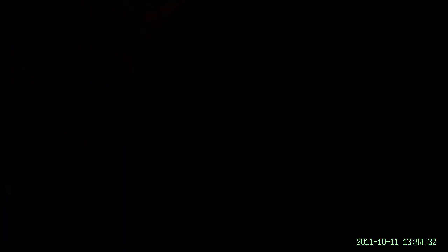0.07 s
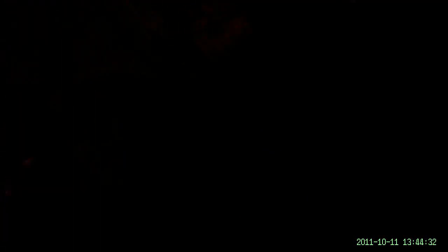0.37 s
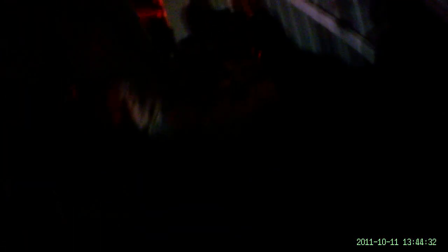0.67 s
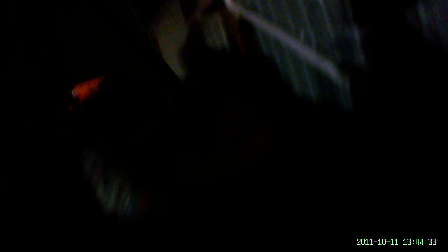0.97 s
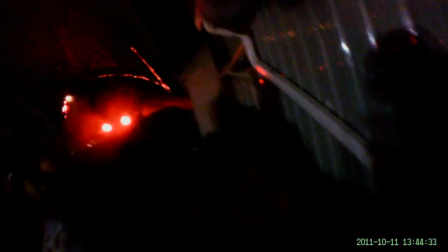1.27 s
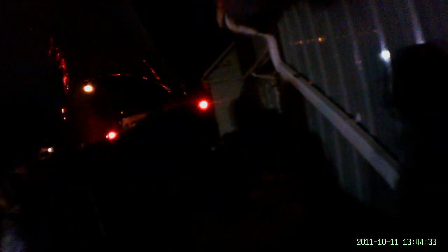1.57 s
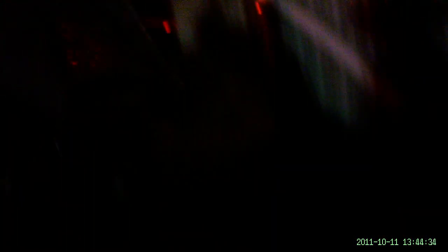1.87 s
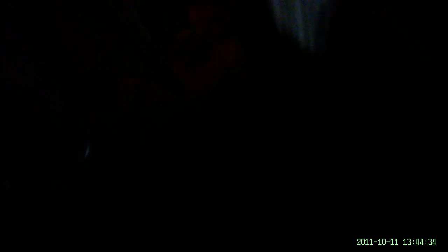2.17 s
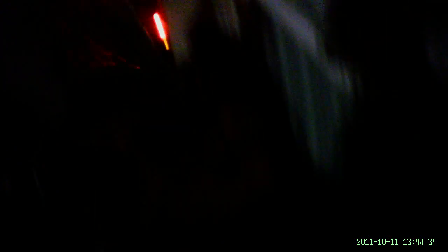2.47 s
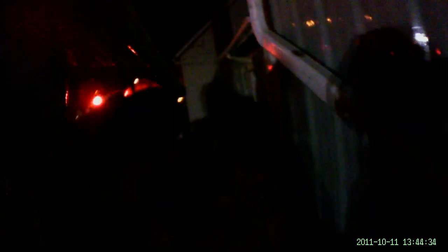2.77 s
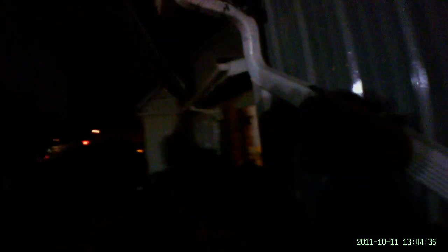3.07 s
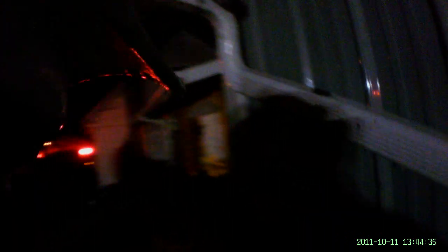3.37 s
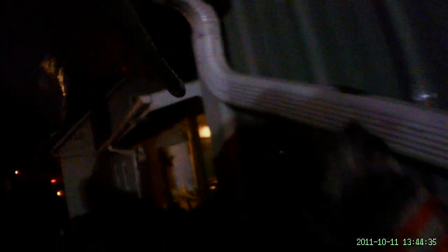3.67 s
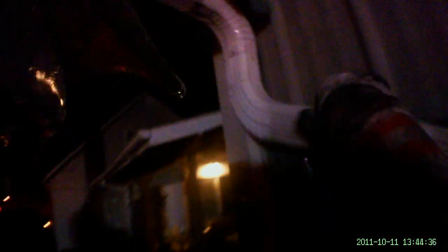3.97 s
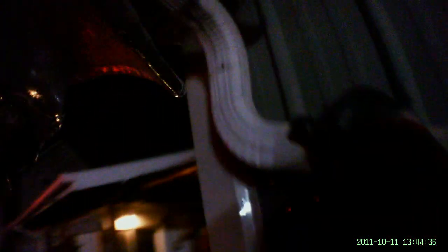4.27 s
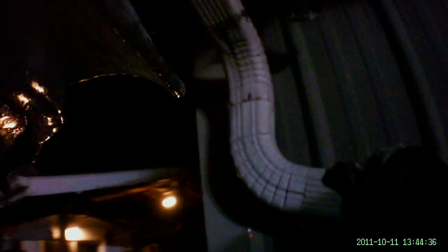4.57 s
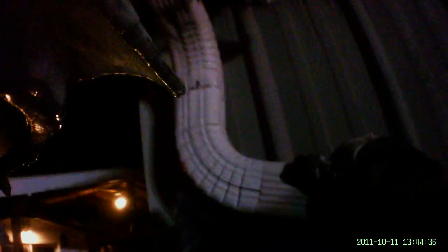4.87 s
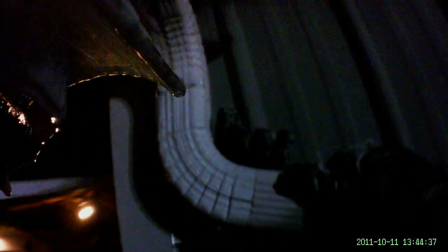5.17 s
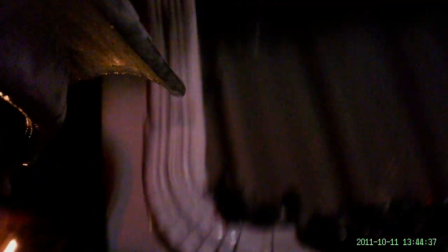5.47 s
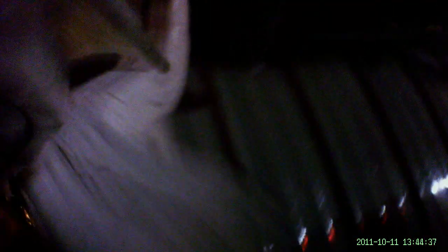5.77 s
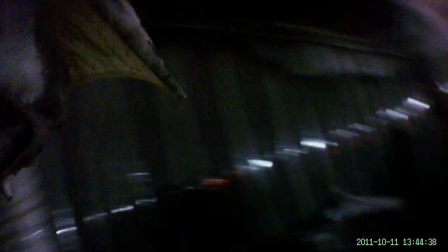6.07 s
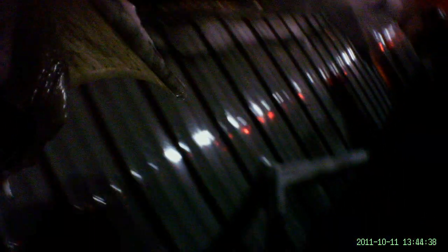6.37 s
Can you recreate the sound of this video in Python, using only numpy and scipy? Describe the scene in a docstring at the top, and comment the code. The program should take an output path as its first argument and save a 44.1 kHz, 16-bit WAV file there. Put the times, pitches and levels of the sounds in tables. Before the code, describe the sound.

A faint distant engine idles outdoors under light hiss and a thin whine, heard from a microphone worn on the body. A short scrape and clank of loose metal siding comes right at the start. From about 0.7 to 4.4 seconds, muffled footsteps thud roughly every 0.6 seconds, with rubbing cloth, dull knocks of boots and gear, and scattered light metal scrapes. Around 5 seconds the cloth rubs harder, and from 5.4 seconds another step, sharper clanks and louder knocks come close by. At about 5.9 and 6.1 seconds, two heavy blows strike a metal panel beside the microphone, each with a quick rebound. They are far louder than everything else, with a deep boom that overloads and distorts. The panel rumbles and its fixings crackle, with a low push of air and a few dry snaps at about 6.3 seconds.

```python
"""At a metal-clad wall at night, heard from a small camera worn by a worker walking up to it.
Over a distant engine, cloth rubs, steps thud through the body and gear knocks in short, damped modes.
Loose siding scrapes and clanks as stick-slip friction excites its resonances. At the end two heavy
blows beside the microphone set a panel booming in its modes and overload the recorder."""
import sys
import numpy as np
from scipy import signal
from scipy.fft import rfft, irfft, next_fast_len
from scipy.io import wavfile

SR = 44100
rng = np.random.default_rng(int(sys.argv[2]) if len(sys.argv) > 2 else 0)


def wav_out(sig):
    """Save sig, one row per channel (or a flat mono array), as 16-bit PCM at SR to the path in sys.argv[1]."""
    wavfile.write(sys.argv[1], SR, np.round(np.clip(np.atleast_2d(sig).T, -1, 1) * 32767).astype(np.int16))


N = 283122
T = np.arange(N) / SR


def from_db(db):
    """Decibels to amplitude ratio."""
    return 10 ** (np.asarray(db) / 20)


def unit_rms(x):
    """Normalisation to unit power."""
    return x / np.sqrt(np.mean(x ** 2) + 1e-20)


def cut(x, hz, kind, order=2):
    """Causal low-, high- or band-pass filtering."""
    return signal.sosfilt(signal.butter(order, hz, kind, fs=SR, output="sos"), x + 1e-18)


def noise(spectrum):
    """Spectral shaping: white noise takes on a given colour, at rms 1."""
    hz, db = np.transpose(spectrum)
    size = next_fast_len(N)
    f = np.maximum(np.fft.rfftfreq(size, 1 / SR), 1)
    gain = from_db(np.interp(np.log(f), np.log(hz), db))
    skirts = np.minimum(f / hz[0], 1) * np.minimum(hz[-1] / f, 1)
    return unit_rms(irfft(rfft(rng.standard_normal(size)) * gain * skirts, size)[:N])


def ring(force, hz, t60):
    """Damped oscillator: a unit impulse starts a decaying sine of height 1."""
    r, w = np.exp(-np.log(1000) / (t60 * SR)), 2 * np.pi * hz / SR
    return signal.lfilter([0, np.sin(w)], [1, -2 * r * np.cos(w), r * r], force + 1e-18)


def resonate(x, hz, width_hz):
    """Second-order resonance with unit peak gain."""
    r, w = np.exp(-np.pi * width_hz / SR), 2 * np.pi * hz / SR
    return signal.lfilter(np.array([1, 0, -1]) * (1 - r * r) / 2, [1, -2 * r * np.cos(w), r * r], x + 1e-18)


def decay(start_s, t60):
    """Exponential decay after a sudden onset."""
    return (T >= start_s) * np.exp(-np.log(1000) * np.clip((T - start_s) / t60, 0, 2))


def grains(per_s, spread_db):
    """Shot noise: random tiny contacts of uneven size, at rms 1."""
    contacts = (rng.random(N) < per_s / SR) * rng.choice([-1, 1], N)
    return unit_rms(contacts * from_db(spread_db * np.clip(rng.standard_normal(N), -2, 2)))


def click(start_s):
    """A unit impulse."""
    return signal.unit_impulse(N, round(start_s * SR))


# Spectrum of distant engine and microphone hiss: frequency_hz, density_db
BACKGROUND_SPECTRUM = [(20, -11), (40, -6), (70, 2), (130, -8.5), (300, -10), (550, -19), (850, -18.5),
                       (1400, -25.5), (2500, -29.5), (5000, -33.5), (10000, -35), (16000, -34)]
# Faint machine whines: start_s, end_s, pitch_hz, level_db
WHINES = [(0, 2.54, 955, -60.5), (0, 2.4, 754, -80), (3.1, 5.8, 786, -62), (3.1, 4.68, 1162, -66)]

def distant_machines(noise_db=-45, firing_hz=37.7, firing_db=-47, whine_width_hz=10, fade_s=0.087):
    """Periodic firing gives an idling engine its note; narrow-band noise makes unsteady whines."""
    out = from_db(noise_db) * noise(BACKGROUND_SPECTRUM)
    out += from_db(firing_db) * np.sqrt(2) * np.sin(2 * np.pi * firing_hz * T)
    for start, end, hz, db in WHINES:
        gate = np.clip(np.minimum(T - start, end - T) / fade_s + 1, 0, 1)
        band = resonate(rng.standard_normal(N), hz, whine_width_hz)
        out += from_db(db) * gate * unit_rms(resonate(band, hz, 2 * whine_width_hz))
    return out


# Spectra of cloth rustling and swaying: frequency_hz, density_db
RUSTLE_SPECTRUM = [(50, -48), (105, 7.5), (180, 2), (330, -7), (500, -10.5), (900, -30.5), (2500, -38.5)]
SWAY_SPECTRUM = [(8, -10), (20, -1.5), (36, -3.5), (60, -21), (110, -38), (400, -79)]
# Longer rubs as the body leans and reaches: centre_s, half_length_s, level_db
RUBS = [(0.148, 0.044, -41.5), (1.94, 0.031, -42), (2.156, .08, -42), (4.876, 0.1, -44), (5.115, .11, -37),
        (5.598, 0.14, -34), (5.81, 0.032, -30)]

def clothing(rise_s=0.039, fall_s=0.092):
    """Friction noise: heavy cloth rubs and sways at the microphone with every stride and reach."""
    stride = sum(np.exp(-np.maximum((s - T) / rise_s, (T - s) / fall_s)) for s, _, _ in STEPS)
    rub = sum(from_db(db) * np.exp(-np.minimum(((T - s) / half) ** 2, 20)) for s, half, db in RUBS)
    rustle = from_db(-51) + from_db(-42.5) * stride + rub
    sway = from_db(-53.5) + from_db(-29) * stride + from_db(-1.5) * rub
    return rustle * noise(RUSTLE_SPECTRUM) + sway * noise(SWAY_SPECTRUM)


# Footfalls felt through the body: centre_s, thud_db, sway_hz
STEPS = [(0.662, -11, 25), (1.285, -12, 31), (1.856, -21.5, 25), (2.416, -16.5, 14.4), (3.12, -13.5, 20.5),
         (3.742, -19.5, 25), (4.412, -24, 22), (5.525, -19, 7.2)]
# Spectrum of a scuffing sole: frequency_hz, density_db
SCUFF_SPECTRUM = [(40, -10), (90, 10.5), (200, -3), (400, -6), (800, -26), (2000, -36), (6000, -42)]

def footsteps(bounce_lag_s=0.124, bounce_db=-14.5, scuff_db=-18, scuff_s=0.026, grit_db=-32, grit_s=0.0076):
    """Body conduction: each step jolts the camera, which bounces once; the sole scuffs and crunches."""
    thud, scuff, grit = np.zeros((3, N))
    for s, thud_db, sway_hz in STEPS:
        for lag, part_db in ((0, 0), (bounce_lag_s, bounce_db)):
            swing = np.minimum((np.pi * sway_hz * (T - s - lag)) ** 2, 20)
            thud += from_db(thud_db + part_db) * (1 - 2 * swing) * np.exp(-swing)
        scuff += from_db(thud_db + scuff_db) * np.exp(-np.minimum(abs(T - s) / scuff_s, 20))
        grit += from_db(thud_db + grit_db) * np.exp(-np.minimum(abs(T - s) / grit_s, 20))
    scuff *= noise(SCUFF_SPECTRUM)
    grit *= cut(rng.standard_normal(N), 2500, "high", order=1)
    return thud + scuff + grit


def walking_knocks(boot_hz=375, boot_t60=0.036, jostles=16, gear_db=-38, gear_hz=362, gear_t60=0.11):
    """Light impacts of heel, toe and randomly jostled gear, as rows like DULL_KNOCKS."""
    heel, toe = (-0.016, -27.5), (0.06, -33)   # lag_s, level_db
    boots = [(s + lag, db, boot_hz, boot_t60) for s, _, _ in STEPS for lag, db in (heel, toe)]
    gear = [(s, gear_db, gear_hz, gear_t60) for s in rng.uniform(0, STEPS[-1][0], size=jostles)]
    return [(s, db, hz * np.exp(0.15 * rng.standard_normal()), t60) for s, db, hz, t60 in boots + gear]


# Dull knocks of boots, tools and gear, and of loose siding flopping: start_s, level_db, pitch_hz, t60_s
DULL_KNOCKS = [(0.056, -28, 415, 0.037), (0.158, -27.5, 323, 0.073), (1.270, -27.5, 295, 0.13),
               (1.324, -23, 398, .046), (1.507, -27, 365, 0.027), (2.151, -30, 600, 0.014),
               (2.174, -21.5, 310, 0.036), (2.457, -30.5, 378, 0.026), (2.836, -31.5, 390, 0.03),
               (3.207, -22.5, 212, 0.045), (3.400, -38.5, 297, 0.12), (3.697, -18.5, 254, 0.02),
               (3.727, -35.5, 655, 0.037), (4.397, -37, 660, 0.053), (4.584, -36, 550, 0.027),
               (4.653, -30, 430, 0.028), (5.426, -26.5, 526, 0.021), (5.466, -18.5, 588, 0.04),
               (5.624, -22, 322, 0.1), (5.649, -18.5, 446, 0.02), (5.777, -8.5, 334, 0.028),
               (5.848, -25, 452, 0.12), (6.075, -7.5, 332, 0.033)]

def knocks(overtone_db=-12, undertone_ratio=0.533, undertone_db=-7, chatter_db=-27, contact_hz=1100):
    """A soft contact acts as a low-pass: padded objects bump and chatter, exciting three damped modes."""
    out, size = np.zeros(N), SR // 4
    for s, db, hz, t60 in DULL_KNOCKS + walking_knocks():
        chatter = rng.standard_normal(size) * np.exp(-np.log(1000) * T[:size] / t60)
        force = signal.unit_impulse(size) + from_db(chatter_db) * chatter
        overtone_ratio = rng.uniform(0.8, 2.7)   # each object has its own shape
        modes = ring(force, hz, t60)
        modes += from_db(overtone_db) * ring(force, hz * overtone_ratio, t60 / 2)
        modes += from_db(undertone_db) * ring(force, hz * undertone_ratio, t60)
        out[round(s * SR):round(s * SR) + size] += from_db(db) * modes
    return cut(out, contact_hz, "low")


# Resonances of the loose siding: pitch_hz, width_hz, level_db
SIDING_MODES = [(463, 17, 11), (765, 85, 7.5), (949, 83, 7.5), (1004, 87, 7.5), (1140, 64, -2),
                (1490, 700, -4), (1750, 220, -2.5), (2680, 280, -6.5), (3140, 300, -11), (3840, 310, -7),
                (5360, 1500, -17), (6830, 223, -47)]

def clank(force, treble, ring_hz, ring_db=-2, wash_db=-11, uneven_db=1.5, detune=0.04, split_hz=2100):
    """Modal superposition: each place on the sheet weights the modes differently and adds its own ring."""
    pitches, widths, levels = np.transpose(SIDING_MODES)
    gains = from_db(levels + uneven_db * rng.standard_normal(len(levels)))
    pitches = pitches * np.exp(detune * rng.standard_normal(len(levels)))
    modes = sum((-1) ** k * gains[k] * resonate(treble if hz > split_hz else force, hz, widths[k])
                for k, hz in enumerate(pitches))
    wash = from_db(wash_db) * cut(force, [400, 4200], "band")   # the many weak modes in between
    local_ring = from_db(ring_db) * resonate(force, ring_hz, width_hz=170)
    return (modes + wash + local_ring) / np.sqrt(np.pi * np.sum(widths * gains ** 2) / SR)


# Scrapes and clanks of the siding: start_s, level_db, length_s, treble_db, ring_hz
CLANKS = [(0.097, -34.5, 0.023, -1.5, 1170), (0.1287, -21.5, 0.004, 1, 3430),
          (0.135, -28.5, 0.032, -4.5, 830), (0.271, -40.5, 0.045, -2, 1110), (0.34, -53.5, 0.01, 16, 4270),
          (0.655, -41, 0.03, 1, 1120), (0.812, -39, 0.059, -7, 1070), (1.262, -35, 0.041, -6, 590),
          (1.469, -36.5, 0.031, -6, 1104), (1.615, -41.5, 0.019, 5, 950), (2.169, -41, 0.008, -2, 950),
          (3.39, -39, 0.019, 6, 1870), (3.923, -50, 0.027, 2.5, 1720), (4.295, -44, 0.0032, 4.5, 5460),
          (4.65, -41, 0.0056, -5, 1690), (5.4545, -30.5, 0.0073, 4.5, 3040), (5.469, -33, .012, -7, 726),
          (5.615, -35.5, 0.024, -14, 816), (5.773, -30, 0.0037, -9, 910),
          (5.8068, -19.5, 0.0027, 2.5, 1110), (5.839, -26, 0.021, -3.5, 1430)]
# Edge sizzle relative to the treble, growing as the wall comes near: time_s, level_db
EDGE_SIZZLE = [(0, -25), (3.9, -27), (5.5, -14.5)]

def siding(t60=0.056, treble_t60=0.052, sizzle_t60=0.029, linger_s=0.02, snap_db=19, loss_db_per_s=452):
    """Stick-slip friction: sheet edges snap loose, then catch and slip in a run of small contacts."""
    out, size = np.zeros(N), SR // 4
    slips = grains(per_s=5000, spread_db=3.5)
    sizzle = unit_rms(resonate(slips, hz=10300, width_hz=4000))   # the thin cut edge itself
    for s, db, length, treble_db, ring_hz in CLANKS:
        span = slice(round(s * SR), round(s * SR) + size)
        # Long scrapes start more gently and die away more slowly than quick clanks.
        snap = from_db(snap_db - loss_db_per_s * length) * signal.unit_impulse(size)
        fade = np.log(1000) * np.maximum(T[:size] - length, 0) / (1 + length / linger_s)
        force = snap + slips[span] * np.exp(-fade / t60)
        treble = from_db(treble_db) * (snap + slips[span] * np.exp(-fade / treble_t60))
        edge_db = treble_db + np.interp(s, *np.transpose(EDGE_SIZZLE))
        edge = from_db(edge_db) * sizzle[span] * np.exp(-fade / sizzle_t60)
        out[span] += from_db(db) * (clank(force, treble, ring_hz) + edge)
    return out


# Creaks of the settling panel: start_s, strength_db
CREAKS = [(6.0625, -24.5), (6.0855, -23), (6.3115, -9), (6.3272, -6), (6.3536, -7)]

def creaks(band_hz=(600, 3800)):
    """Band-limited impulses: the panel settles in dry snaps that do not ring."""
    return cut(sum(from_db(db) * click(s) for s, db in CREAKS), band_hz, "band")


def loose_fixings(level_db=-34, t60=0.58, band_hz=(600, 2500)):
    """Contact rattle: nails and seams crackle while the panel's swing decays."""
    swing = sum(decay(s, t60) for s, *_ in BLOWS)
    crackle = unit_rms(cut(grains(per_s=730, spread_db=0.5), band_hz, "band"))
    return from_db(level_db) * swing * crackle


def lurch(centre_s=6.276, level_db=2.5, hz=20):
    """Air displacement: the loosened sheet swings back once, giving a rarefaction, then a compression."""
    phase = np.clip(2 * np.pi * hz * (T - centre_s), -10, 10)
    return from_db(level_db) * phase * np.exp((1 - phase ** 2) / 2)


# Two heavy blows, each with a rebound: start_s, level_db, hardness_db_per_octave, stretch_ratio, flex_db
BLOWS = [(5.8890, 20.5, 3, .3, -2.5), (5.9139, 18, 3.5, 0.111, -6), (6.115, 20, 2, 0.55, -9.5),
         (6.1382, 17.5, 0.5, 0.12, -10.5)]
# Modes of the struck panel: pitch_hz, level_db, t60_s
PANEL_MODES = [(146.65, 3, 0.3), (174.2, -14, 0.13), (245.7, -2.5, 0.1843), (266.7, -13, 0.13),
               (299.8, -4.5, 0.129), (396.4, -16, 0.2), (511, -11, 0.12), (660.3, -32, 0.16),
               (841, -27, 0.056), (1123, -15.5, 0.042), (1490.5, -25, 0.062)]
# Slow flexing modes of the whole sheet: pitch_hz, level_db, t60_s
FLEX_MODES = [(18.3, -12, 0.38), (36.55, -16.5, 0.71), (80.2, -22, 0.43), (104.75, -7.5, 0.59),
              (124.4, 2.5, 0.317)]

def panel_blows(stretch_s=0.022, surge=6.4, surge_s=0.01135, rattle_db=-39, buffet_db=-20):
    """Tension modulation: a blow stretches the panel, so its boom starts sharp and sinks in pitch."""
    out, lowest_hz = np.zeros(N), PANEL_MODES[0][0]
    for s, db, hardness_db, stretch, flex_db in BLOWS:
        age = np.maximum(T - s, 0)
        clock = age + stretch * stretch_s * (1 - np.exp(-age / stretch_s))   # runs fast while taut
        boom = np.zeros(N)
        for hz, mode_db, t60 in PANEL_MODES:
            gain = from_db(mode_db + hardness_db * np.log2(hz / lowest_hz))
            boom += gain * np.sin(2 * np.pi * hz * clock) * decay(s, t60)
        boom *= 1 + surge * np.exp(-age / surge_s)   # seam friction quickly damps the first wide swings
        flex = sum(from_db(mode_db + flex_db) * ring(click(s), hz, t60) for hz, mode_db, t60 in FLEX_MODES)
        # The panel rattles on its fixings and buffets the microphone.
        rattle = unit_rms(cut(rng.standard_normal(N), [300, 900], "band"))
        rattle *= from_db(rattle_db) * decay(s, t60=0.086)
        buffet = unit_rms(cut(rng.standard_normal(N), [18, 95], "band", order=3))
        buffet *= from_db(buffet_db) * decay(s, t60=0.64)
        out += from_db(db) * (boom + flex + rattle + buffet)
    return out


def scene():
    """Superposition: all sources add at one microphone."""
    approach = distant_machines() + footsteps() + clothing() + siding() + knocks()
    return (approach + panel_blows() + loose_fixings() + lurch() + creaks())[None]


def record(dry, ceiling=0.944, knee_sharpness=34, cutoff_hz=15950, oversample=4):
    """Saturation: the input stage clips hard, with slightly rounded corners; a low-pass cuts the top."""
    fine = signal.resample_poly(dry, oversample, 1, axis=1, padtype="edge")
    clipped = fine / (1 + abs(fine / ceiling) ** knee_sharpness) ** (1 / knee_sharpness)
    low_pass = signal.firwin(601, cutoff_hz, window="blackman", fs=oversample * SR)
    return signal.resample_poly(clipped, 1, oversample, axis=1, padtype="edge", window=low_pass)


dry = scene()
out = record(dry)
wav_out(out)
```